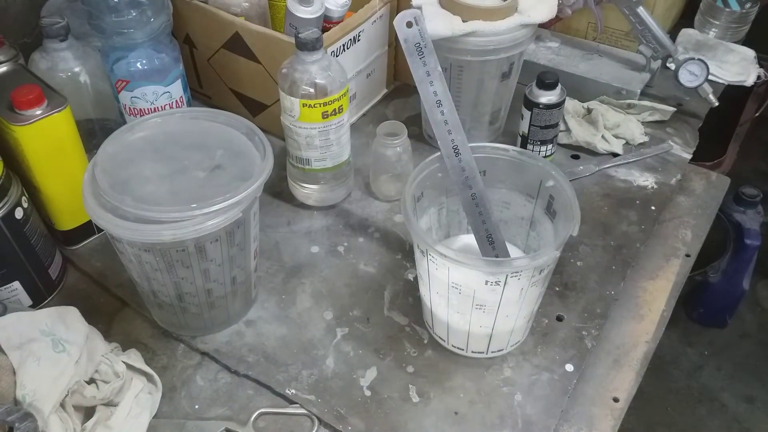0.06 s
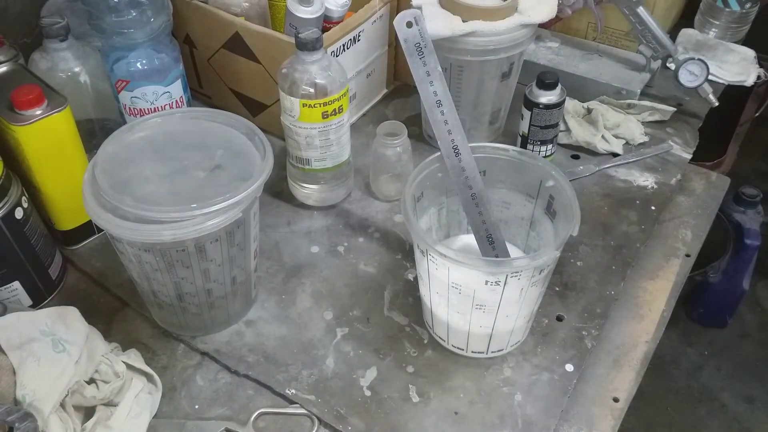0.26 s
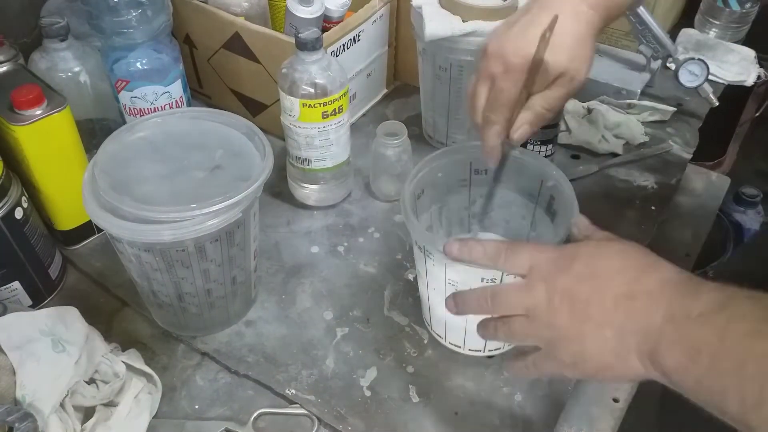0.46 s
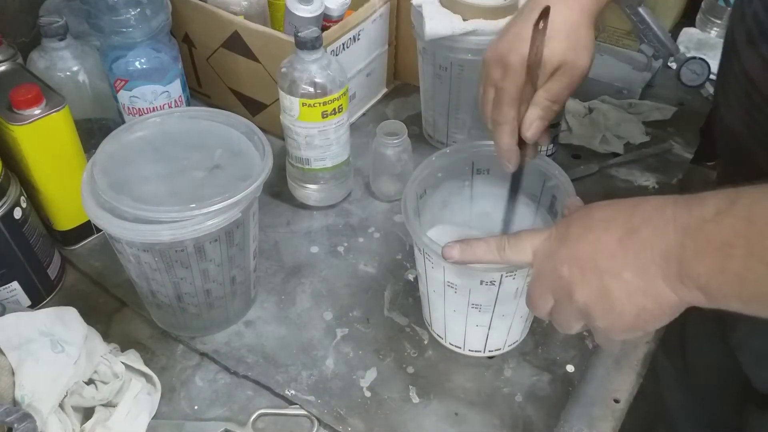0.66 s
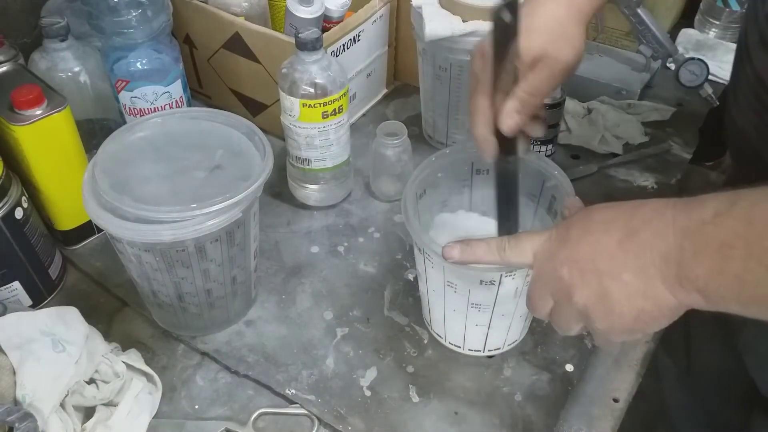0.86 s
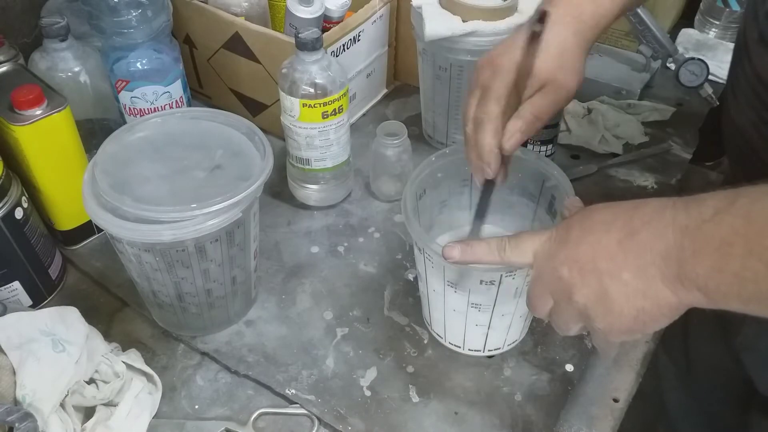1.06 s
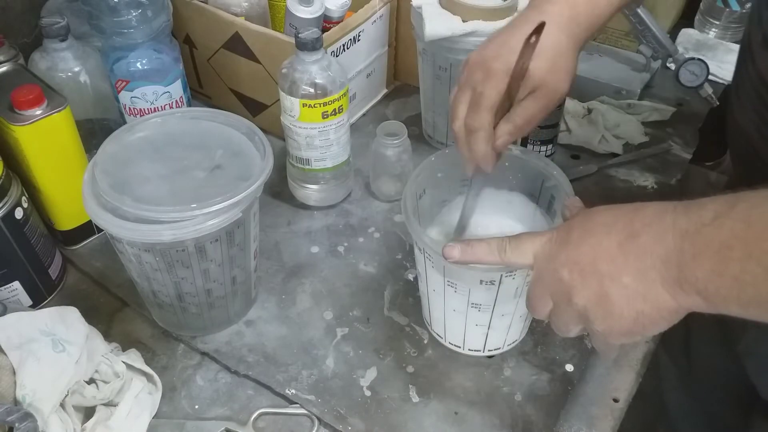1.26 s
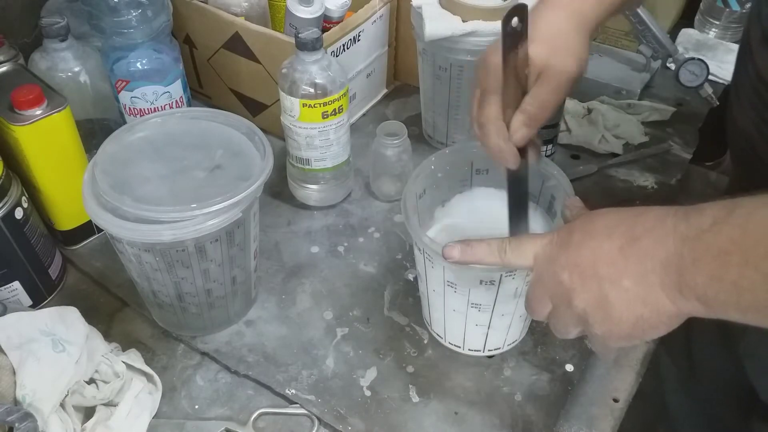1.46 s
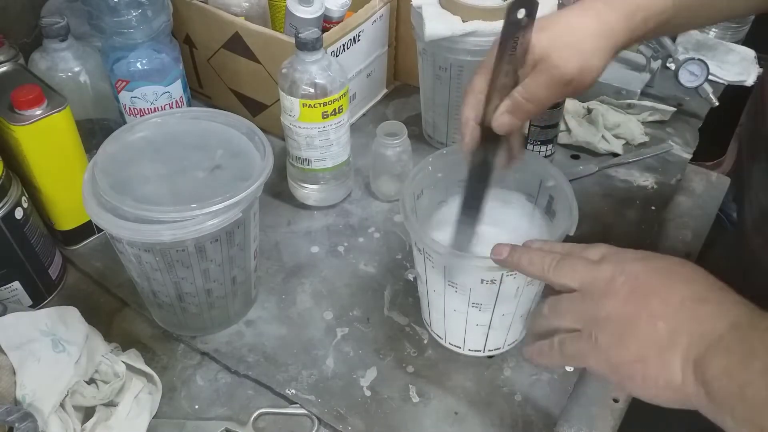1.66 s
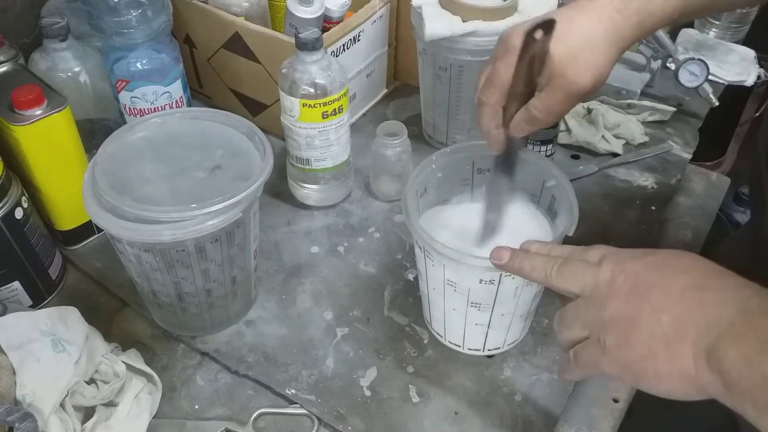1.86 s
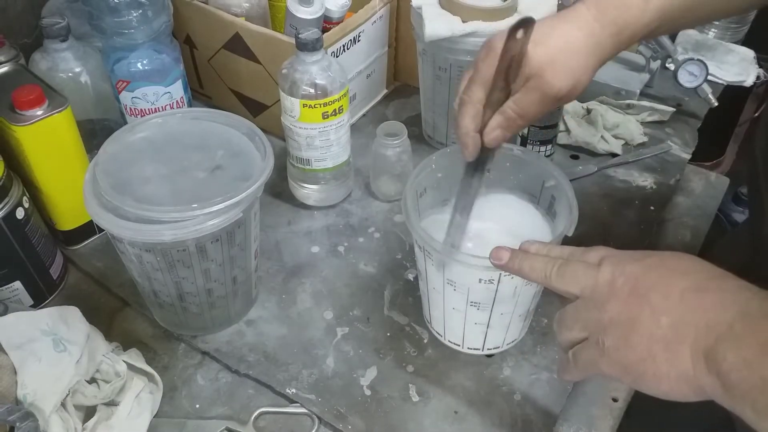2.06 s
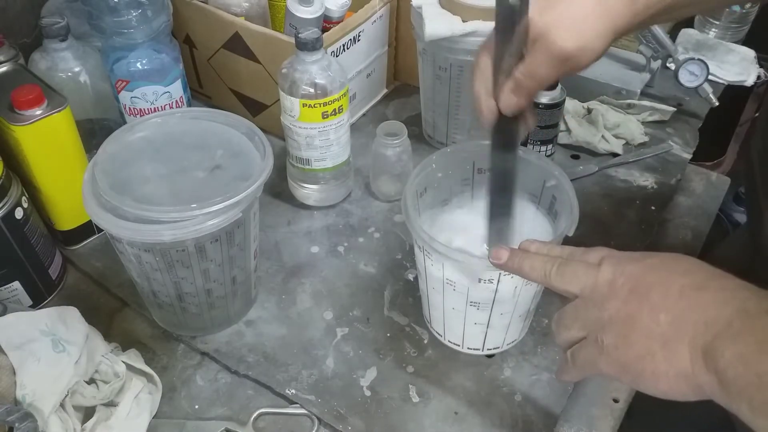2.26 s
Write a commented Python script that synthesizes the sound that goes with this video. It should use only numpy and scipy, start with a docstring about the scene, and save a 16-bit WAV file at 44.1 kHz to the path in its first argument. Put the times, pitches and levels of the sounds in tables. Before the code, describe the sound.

A steel ruler stirs paint in a plastic cup. Faint rustle and a light tap open over hiss and low throbbing; at 0.23 s a loud, bright double clack rings and is choked by the grip. Rubbing and wet ticks follow to 0.6 s, then quiet gulps, knocks around 1 s, scrapes at 1.5 s, livelier bubbling, and a cluster of firmer knocks at 2.2 s. Small dry garage, close, centred.

```python
"""A steel ruler clacks against a plastic cup on a workbench as it is grabbed, then stirs thinned paint.
The ruler and cup ring as damped modes; knocks add noise cracks, and scrapes are shaped noise.
Paint gulps and bubbles are damped rising tones; wet ticks are settling tones under noise.
Hands and sleeves rustle over the hiss and low throb of a small, dry garage, in near mono."""
import sys
import numpy as np
from scipy import signal
from scipy.fft import rfft, irfft, next_fast_len
from scipy.io import wavfile
from scipy.ndimage import uniform_filter1d, map_coordinates

SR = 44100
rng = np.random.default_rng(int(sys.argv[2]) if len(sys.argv) > 2 else 0)


def put_to_file(sound):
    """Save the sound as 16-bit audio at rate SR, in the file named by the first command-line argument."""
    columns = np.atleast_2d(sound).T  # one column per channel
    safe = np.clip(columns, -1, 1)
    whole_steps = np.round(safe * 32767)
    wavfile.write(sys.argv[1], SR, whole_steps.astype(np.int16))


N = 101429
TIME = np.arange(N) / SR  # s through the scene
AGE = np.arange(SR // 4) / SR  # s since one event began

# The low swirl of the paint over time. Each row: time in seconds, relative level in dB.
SWIRL = [(0, -62), (0.3, -85), (0.38, -69.5), (0.63, -67), (1.0, -67), (1.47, -66.5), (1.72, -58.5),
         (1.82, -66), (1.9, -61), (2.19, -60.5), (2.3, -63)]
STIR_START_S, STIR_END_S = 0.6, 2.3
# how a gulp or bubble starts, and the share of its first pitch gained each second
GULP_ATTACK_S, GULP_RISE_PER_S = 0.0028, 1.15


def amp(db):
    """Decibels to gain."""
    return 10 ** (np.asarray(db) / 20)


def unit(x):
    """Scale to rms 1."""
    return x / np.sqrt(np.mean(x ** 2) + 1e-20)


def add(track, s, sound):
    """Mix a sound in at s seconds, trimmed to the track."""
    start = round(s * SR)
    sound = sound[max(0, -start):]
    part = track[max(0, start):][:len(sound)]
    part += sound[:len(part)]


def wobble(rate, t=TIME):
    """A smooth random curve, rate knots a second."""
    return map_coordinates(rng.standard_normal(4096), [t * rate], mode="wrap")


def coloured(x, colour, tilt_db=0):
    """Shape x by (Hz, dB) points and a tilt per octave above 1 kHz; rms 1."""
    size = next_fast_len(len(x), True)
    octave = np.log2(np.fft.rfftfreq(size, 1 / SR) + 1)
    hz, db = np.transpose(colour)
    curve_db = np.interp(octave, np.log2(hz), db)
    gain = amp(curve_db + tilt_db * np.maximum(octave, np.log2(1000)))
    return unit(irfft(rfft(x, size) * gain, size)[:len(x)])


def patchy(x, depth_db):
    """The colour shifts from moment to moment in small random patches of time and pitch; rms 1."""
    z = signal.stft(x, nperseg=256)[2]
    field = rng.standard_normal(z.shape)
    for axis in (0, 1):
        field = uniform_filter1d(field, size=4, axis=axis)
    shifted = signal.istft(z * amp(depth_db * unit(field)))[1]
    return unit(shifted[:len(x)])


def decay(t60, attack):
    """A quick rise, then an exponential fall; both times in seconds."""
    return np.exp(-np.log(1000) * AGE / t60) * (1 - np.exp(-AGE / attack))


def ring(modes, attack):
    """Damped modes of a struck body; neighbours start in opposite directions."""
    out = np.zeros(len(AGE))
    for k, (hz, db, t60) in enumerate(modes):
        out += (-1) ** k * amp(db) * decay(t60, attack) * np.sin(2 * np.pi * hz * AGE)
    return out


def choke(t, fade_s, db):
    """A smooth drop in level around t = 0."""
    return amp(db * (1 + np.tanh(t / fade_s)) / 2)


def rustle():
    """Finely grained rustle of hands and sleeves, the low swirl of paint and a steady hiss."""
    # Rustle of hands, sleeves and paint. Each row: time in seconds, relative level in dB.
    rustle_levels = [(0, -57.5), (0.12, -56.5), (0.175, -61.5), (0.205, -66), (0.305, -74), (0.335, -56),
                     (0.385, -58.5), (0.41, -66), (0.45, -56.5), (0.53, -51.5), (0.565, -60), (0.63, -62.5),
                     (0.725, -75.5), (0.77, -58.5), (0.82, -65), (0.94, -68.5), (1.04, -62), (1.22, -63.5),
                     (1.73, -61), (1.82, -70), (1.90, -61), (2.3, -68)]
    # Spectra of rustle and swirl. Each row: frequency in Hz, relative level in dB.
    rustle_colour = [(180, -10.5), (300, -4.5), (946, -9), (2280, -4), (2930, -1.5), (3640, -3.5),
                     (5430, -3), (7820, -7), (9090, -15), (16000, -11.5)]
    swirl_colour = [(25, -2), (60, -6.5), (105, 2.5), (200, 1), (320, -10.5), (560, -7), (900, -21),
                    (3000, -55)]
    hiss_colour = [(30, 31.0), (100, 23.5), (220, 10.5), (1000, 0.0), (7000, -6.5), (15000, -7.0)]

    flutter = amp(2.2 * wobble(800))
    grains = patchy(coloured(rng.standard_normal(N) * flutter, rustle_colour), depth_db=2.5)
    high = grains * amp(np.interp(TIME, *np.transpose(rustle_levels)) + 2.0)
    low = coloured(rng.standard_normal(N), swirl_colour)
    low *= amp(np.interp(TIME, *np.transpose(SWIRL)) + 5.0)
    hiss = amp(-60.5) * coloured(rng.standard_normal(N), hiss_colour)
    return high + low + hiss


def width():
    """What differs between the ears: a thin treble hiss and the bright first touch of steel."""
    touch_s, touch_db = 0.2323, -33
    side = amp(-85.5) * coloured(rng.standard_normal(N), [(5000, -36.5), (8000, -6.5), (15000, -2)])
    touch = coloured(rng.standard_normal(len(AGE)), [(6500, -54.5), (8000, 4.5), (15000, -2)])
    add(side, touch_s, amp(touch_db) * touch * decay(t60=0.025, attack=0.0001))
    return side


def knocks():
    """Short dull blows on the cup, steadied by a finger; pitch depends on where the blade lands."""
    # Ruler on the held cup. Each row: start in seconds, level in dB, pitch of the struck spot in Hz,
    # then relative levels of crack, wall and base in dB.
    blows = [(0.0224, -45.5, 1070, 5, -19, -23.5), (0.8753, -52, 1400, 5, 0, 1),
             (0.9745, -41, 2960, 6, 3.5, -10), (0.9996, -45.5, 1870, 2, 4.5, 3),
             (1.0006, -42, 813, -5, -12, -2), (1.0092, -55, 770, -1.5, 8, 5.5),
             (1.8608, -41.5, 2610, 4, -1, 0.5), (2.0436, -43.5, 1820, 4.5, 7, -3),
             (2.0628, -46, 1370, 0.5, -12, -12), (2.198, -50.5, 1380, -1.5, 5, 5),
             (2.2108, -33, 1705, -0.5, -11, -4.5), (2.218, -46, 2040, -8, -1.5, 0),
             (2.2277, -43, 2320, -4, 0.5, 9), (2.2402, -38.5, 2970, 3, -10, -1.5),
             (2.243, -33.5, 1440, -13, -16, 4.5)]
    # Held cup damped by the paint, then its base thumping on the bench.
    # Each row: frequency in Hz, relative level in dB, decay time t60 in seconds.
    held_modes = [(357, -9, 0.034), (557.5, 3, 0.044), (690, -15, 0.059), (1468, -8, 0.05),
                  (1860, -26, 0.027), (2404, -10, 0.029)]
    base_modes = [(167.5, -3.5, 0.062), (340, 4, 0.02)]
    # Spectrum of the crack. Each row: frequency in Hz, relative level in dB.
    knock_colour = [(80, 3), (300, -1.5), (900, 1.5), (1700, 3), (3500, -1.5), (8300, -11), (9600, -22),
                    (16000, -19)]
    # the struck spot of the wall flexes briefly
    spot_t60_s, spot_db = 0.011, 7
    # after a knock the blade stays on the wall and damps it
    press_s, press_fade_s, press_db = 0.016, 0.0017, -6

    out = np.zeros(N)
    press = choke(AGE - press_s, press_fade_s, press_db)
    crack_decay = decay(t60=0.043, attack=0.0003) + amp(2.0) * decay(t60=0.0063, attack=0.0001)
    for s, db, hz, crack_db, wall_db, base_db in blows:
        crack = coloured(rng.standard_normal(len(AGE)), knock_colour) * crack_decay
        spot = amp(spot_db) * decay(spot_t60_s, attack=0.00027) * np.sin(2 * np.pi * hz * AGE)
        wall = amp(wall_db) * ring(held_modes, attack=0.0011)
        base = amp(base_db) * ring(base_modes, attack=0.0012)
        add(out, s, amp(db) * press * (spot + wall + base + amp(crack_db - 4.0) * crack))
    return out


def scrapes():
    """Dense tiny slips of the blade, as noise under each swelling stroke."""
    # Scrapes and rubs. Each row: peak time in seconds, rise in seconds, fall in seconds, level in dB,
    # treble tilt in dB per octave.
    strokes = [(0.046, 0.015, 0.03, -47, -4.5), (0.282, 0.013, 0.01, -45.5, -8),
               (0.355, 0.044, 0.041, -58, -8), (0.448, 0.015, 0.0079, -52, -2.5),
               (0.538, 0.0057, 0.012, -43, -3), (0.832, 0.003, 0.011, -57.5, -14.5),
               (1.172, 0.0099, 0.0061, -55.5, -1), (1.3, 0.0093, 0.013, -55.5, -2),
               (1.352, 0.038, 0.022, -57, -0.5), (1.536, .013, 0.018, -41.5, -1),
               (1.586, 0.012, 0.012, -43, 0), (1.634, 0.027, 0.0097, -50.5, -2.5),
               (1.673, 0.01, 0.01, -53.5, -2.5), (1.717, 0.039, 0.047, -54, -7.5),
               (1.876, 0.018, 0.02, -45.5, 2), (1.931, 0.013, 0.0058, -51.5, -0.5),
               (2.135, 0.021, 0.028, -55.5, -7.5), (2.224, 0.027, 0.014, -46.5, -13.5)]
    # Spectrum of the slips. Each row: frequency in Hz, relative level in dB.
    scrape_colour = [(100, -35), (400, -3), (1000, -5), (1800, 1.5), (4000, 0.5), (7000, -1.5), (10000, -8),
                     (16000, -7)]

    out = np.zeros(N)
    t = AGE - AGE.mean()  # s from the peak
    for s, rise, fall, db, tilt_db in strokes:
        slips = rng.standard_normal(len(t)) * amp(1.4 * wobble(499.5, AGE))
        swell = np.exp(-(t / np.where(t < 0, rise, fall)) ** 2)
        rub = patchy(coloured(slips, scrape_colour, tilt_db), depth_db=2.5)
        add(out, s + t[0], amp(db) * swell * rub)
    return out


def throbs():
    """Soft low swells of a few cycles each: sines under bell-shaped envelopes."""
    # Each row: peak time in seconds, peak level in dB, frequency in Hz.
    swells = [(0.112, -46.5, 107), (0.209, -47, 107), (0.492, -46.5, 101), (0.682, -49.5, 102),
              (0.867, -52, 101.7), (1.238, -49, 109), (1.348, -46.5, 99), (1.401, -51, 100),
              (1.491, -47, 107), (1.676, -47.5, 114)]
    spread_s = 0.018
    out = np.zeros(N)
    for s, db, hz in swells:
        t = TIME - s
        tone = np.sin(2 * np.pi * (hz * t + rng.random()))
        out += amp(db) * np.exp(-(t / spread_s) ** 2) * tone
    return out


def ruler_clack():
    """The ruler rattles on the cup as the hand takes it: steel and plastic ring until the grip closes."""
    # Each row: start in seconds, level in dB, relative level of steel in dB, of the cup wall in dB.
    clacks = [(0.2340, -18, 4.5, -13), (0.2384, -27, -5, 7), (0.2424, -16.5, -10.5, 4),
              (0.255, -36, -2.5, -12), (0.2742, -47.5, -1, -6.5), (0.2825, -46, -10, 5)]
    # Ruler, then the cup on the bench struck hard.
    # Each row: frequency in Hz, relative level in dB, decay time t60 in seconds.
    steel_modes = [(2017, -12.5, 0.061), (2470, -19, .034), (2760, -8, 0.024), (3184, -10.5, 0.065),
                   (3530, -17.5, .04), (3900, -26.5, 0.032), (4727, 1.5, 0.028), (4790, -10, 0.016),
                   (5480, -10.5, 0.018), (5863, -7, 0.12), (6140, -1, 0.032), (6380, -5, 0.035),
                   (7820, -9.5, 0.036), (11960, -13.5, 0.031)]
    cup_modes = [(244.3, -3.5, 0.034), (350, -4.5, 0.047), (431, -11, 0.049), (594, -11.5, 0.058),
                 (700, -15.5, 0.021), (806, -7.5, 0.029), (998, 2.5, 0.025), (1177, -1, 0.029),
                 (1390, 0.5, 0.04), (1586, -8, 0.038)]
    # Spectrum of the crack. Each row: frequency in Hz, relative level in dB.
    crack_colour = [(80, -47), (250, 15), (500, -16), (1100, 9.5), (2200, -7), (5500, -3.5), (8500, -11.5),
                    (15000, -30)]
    # the fingers close on the ruler and choke its ring
    grip_s, grip_fade_s, grip_db = 0.2555, 0.0019, -10

    out = np.zeros(N)
    for s, db, steel_db, cup_db in clacks:
        crack = coloured(rng.standard_normal(len(AGE)), crack_colour) * decay(t60=0.037, attack=0.00014)
        snap = rng.standard_normal(len(AGE)) * decay(t60=0.0053, attack=0.0001)
        steel = amp(steel_db - 6) * ring(steel_modes, attack=0.00039)
        cup = amp(cup_db - 2.5) * ring(cup_modes, attack=0.0023)
        # only clacks that start before the grip are choked
        grip = choke(s + AGE - grip_s, grip_fade_s, grip_db * (s < grip_s))
        add(out, s, amp(db) * grip * (steel + cup + amp(0.5) * crack + amp(-3.5) * snap))
    return out


def bubble(hz, t60, attack, rise):
    """A damped tone whose pitch rises steadily from hz."""
    return decay(t60, attack) * np.sin(2 * np.pi * hz * (AGE + rise * AGE ** 2 / 2))


def tick(hz, t60):
    """A tiny wet snap: a settling tone under a splash that holds little below its pitch."""
    glide, glide_s = 0.08, 0.0011  # starts this share too high, settles at this pace
    tone_db, splash_db = -2.5, -3.5
    splash_colour = [(hz / 2, -26), (hz * 0.57, -7), (hz, 0), (hz * 2, -10)]
    splash = coloured(rng.standard_normal(len(AGE)), splash_colour)
    tone = np.sin(2 * np.pi * hz * (AGE + glide * glide_s * (1 - np.exp(-AGE / glide_s))))
    return (amp(tone_db) * tone + amp(splash_db) * splash) * decay(t60, 0.00051)


def paint(count=32):
    """Gulps behind the blade, clear ticks, and a scatter of faint ones while stirring."""
    # Paint gulps. Each row: start in seconds, relative level in dB, starting pitch in Hz.
    gulps = [(0.778, -46.5, 199), (0.830, -44.5, 187), (0.854, -49.5, 234), (1.003, -42.5, 594),
             (1.037, -52.5, 542), (1.235, -54.5, 190), (1.294, -47, 198), (1.539, -45, 212),
             (1.590, -50, 297), (1.598, -48, 414), (1.604, -52, 622), (1.642, -41.5, 561),
             (1.689, -47.5, 644), (1.695, -46.5, 334), (1.711, -43, 545), (1.88, -48.5, 347)]
    # Wet ticks and tiny bubbles. Each row: start in seconds, relative level in dB,
    # settled pitch in Hz, decay time t60 in seconds.
    ticks = [(0.37, -37.5, 4070, 0.013), (0.558, -45, 6630, 0.023), (0.5772, -38, 4090, 0.05),
             (0.587, -38.5, 5600, 0.019), (0.5959, -38, 3420, 0.017), (0.92, -32.5, 5080, 0.014),
             (1.058, -46, 3700, 0.035), (1.4883, -26, 13300, 0.0076), (1.714, -49, 3520, 0.049),
             (1.731, -53, 3330, .025), (1.7782, -42, 7500, 0.013), (1.8074, -52.5, 6530, 0.035),
             (1.8477, -33.5, 4910, 0.012), (1.8712, -31.5, 6280, .01), (1.884, -42, 4180, 0.029),
             (1.929, -45.5, 1673, 0.049), (1.995, -44, 2700, 0.026), (2.0706, -35.5, 4680, 0.012)]

    out = np.zeros(N)
    for s, db, hz in gulps:
        add(out, s, amp(db + 7.0) * bubble(hz, 0.052, GULP_ATTACK_S, GULP_RISE_PER_S))
    for s, db, hz, t60 in ticks:
        add(out, s, amp(db) * tick(hz, t60))
    for when, size, pitch in rng.random((count, 3)):
        s = STIR_START_S + (STIR_END_S - STIR_START_S) * when
        add(out, s, amp(-63.5 + 18 * size) * tick(2600 * 3.5 ** pitch, 0.015))
    return out


def gurgle(count=130):
    """Many small overlapping bubbles, denser and stronger with the swirl."""
    out = np.zeros(N)
    swirl_db = np.interp(TIME, *np.transpose(SWIRL))
    stirred = np.cumsum(amp(swirl_db) ** 2 * (TIME > STIR_START_S))
    for when, size, pitch in rng.random((count, 3)):
        i = np.searchsorted(stirred, when * stirred[-1])  # more bubbles where the swirl is strong
        hz = 250 * 2.8 ** pitch
        level = amp(swirl_db[i] - 1.5 + 6.5 * size)
        add(out, TIME[i], level * bubble(hz, 18 / hz, GULP_ATTACK_S, GULP_RISE_PER_S))
    return out


def garage(x):
    """A faint, short answer from the cluttered room: the sound convolved with decaying noise."""
    tail_colour = [(100, 31.5), (2000, -14.5), (7000, 9.0), (15000, 1.5)]
    tail = coloured(rng.standard_normal(len(AGE)), tail_colour) * decay(t60=0.22, attack=0.00094)
    return amp(-26) * signal.fftconvolve(x, tail / np.linalg.norm(tail))[:N]


def scene():
    """The cup stands straight ahead of the microphone, so nearly everything is centred."""
    near = ruler_clack() + knocks() + scrapes() + paint() + gurgle()
    mid = near + garage(near) + throbs() + rustle()
    side = width()
    return np.array([mid + side, mid - side])


def record(dry):
    """The small microphone drops the deep bass; nothing is kept above the band limit."""
    low_cut_hz, top_hz = 79.6, 16000
    high_pass = signal.butter(3, low_cut_hz, "highpass", fs=SR, output="sos")
    thin = signal.sosfilt(high_pass, dry)
    size = next_fast_len(N + SR // 2)
    kept = np.fft.rfftfreq(size, 1 / SR) < top_hz
    return irfft(rfft(thin, size) * kept, size)[:, :N]


dry = scene()
out = record(dry)
put_to_file(out)
```